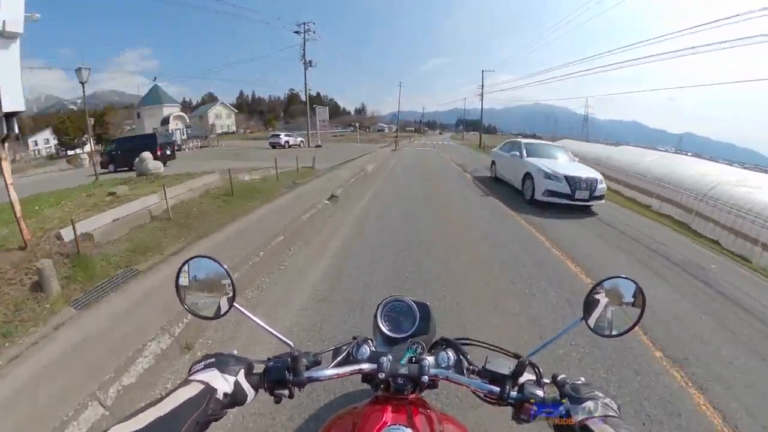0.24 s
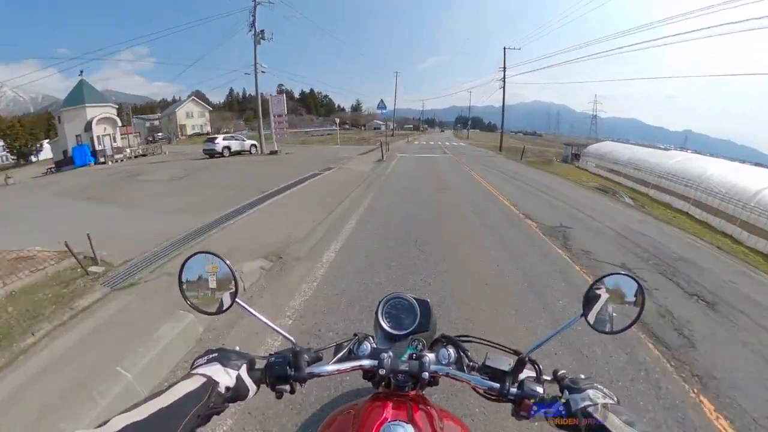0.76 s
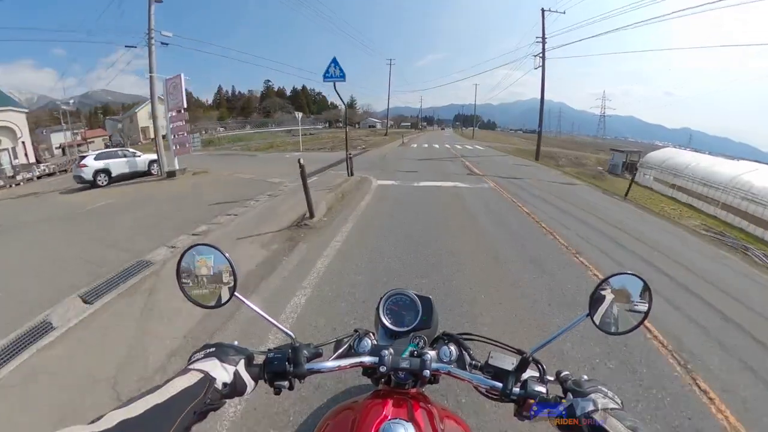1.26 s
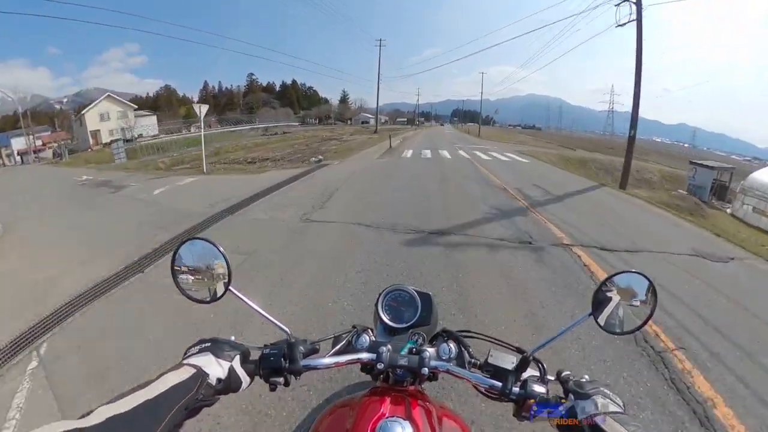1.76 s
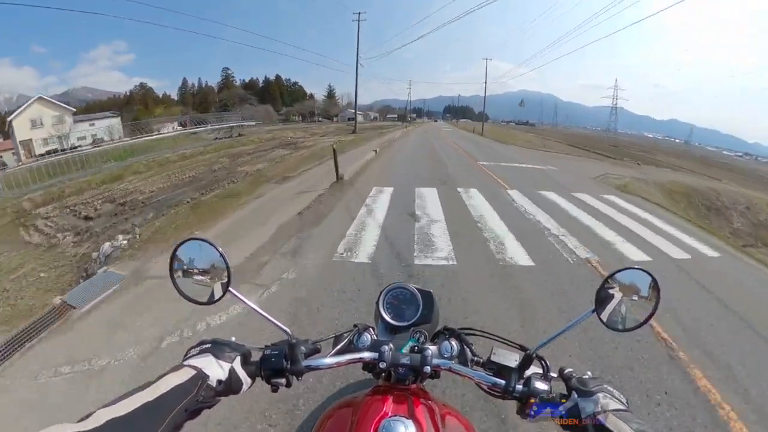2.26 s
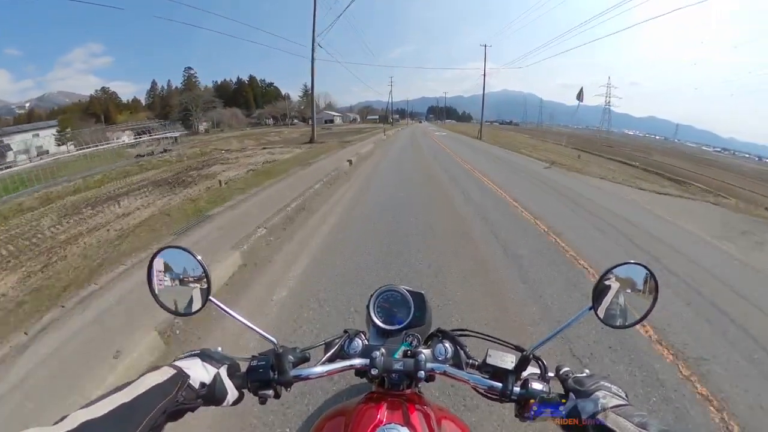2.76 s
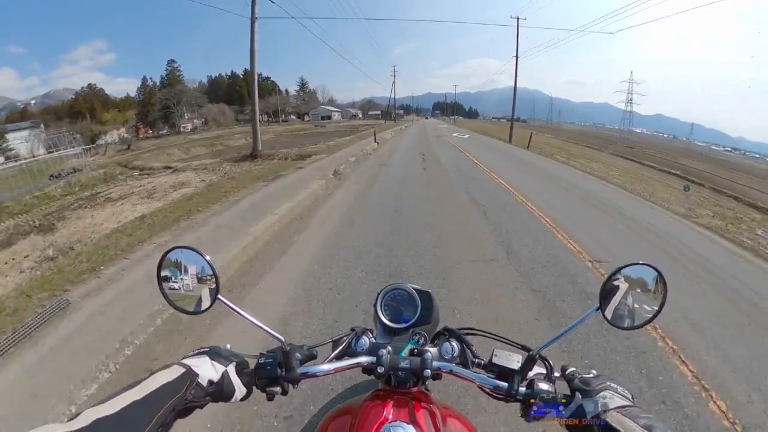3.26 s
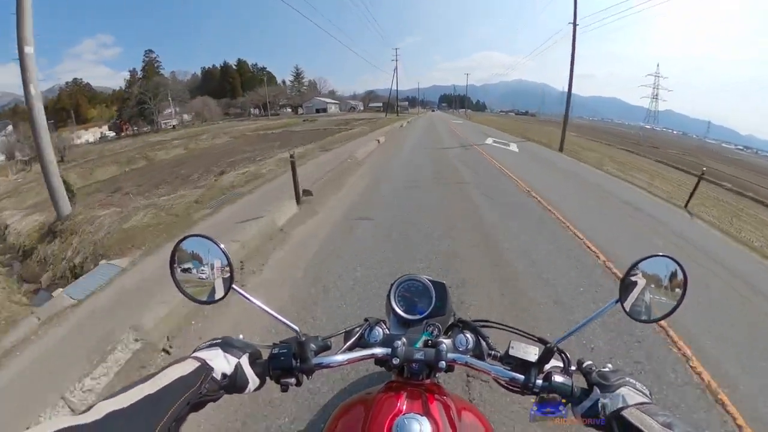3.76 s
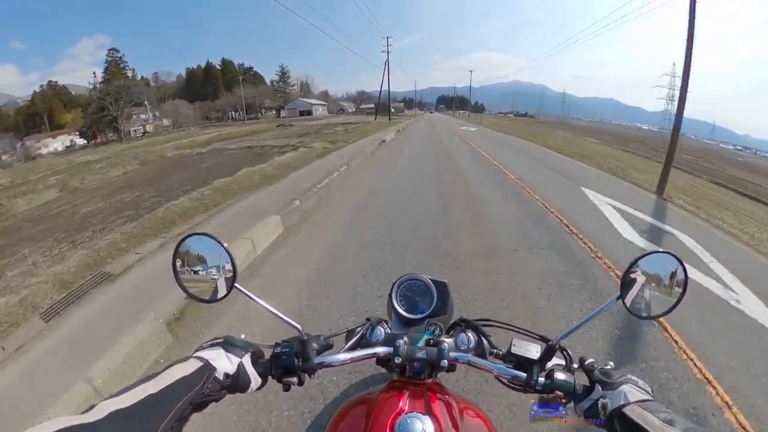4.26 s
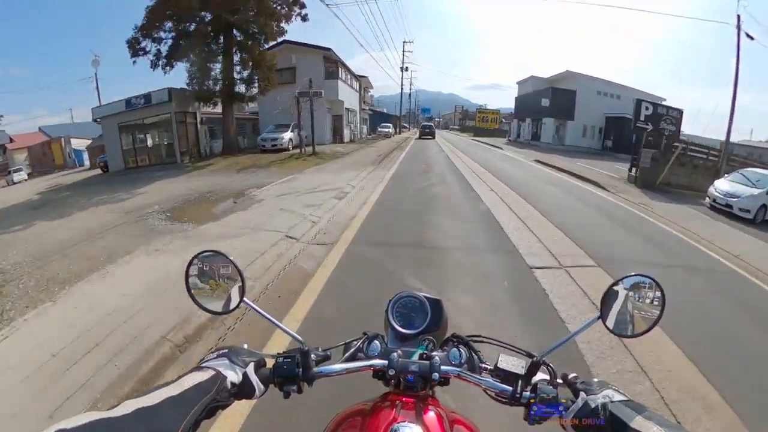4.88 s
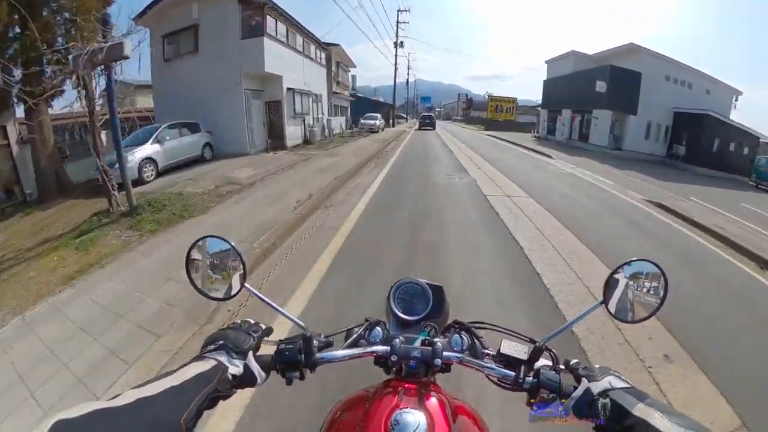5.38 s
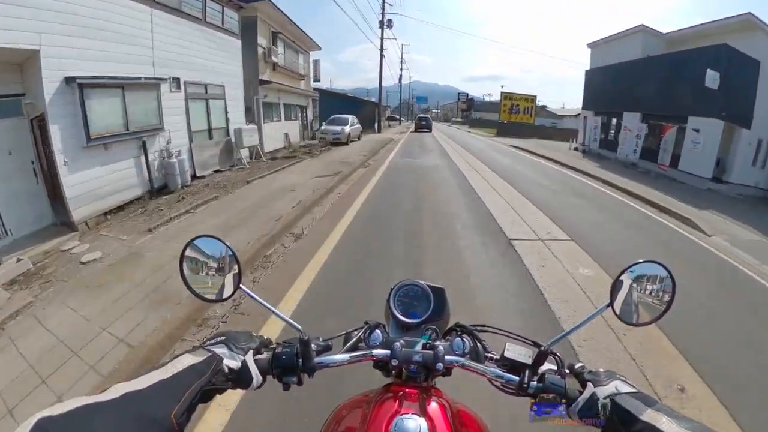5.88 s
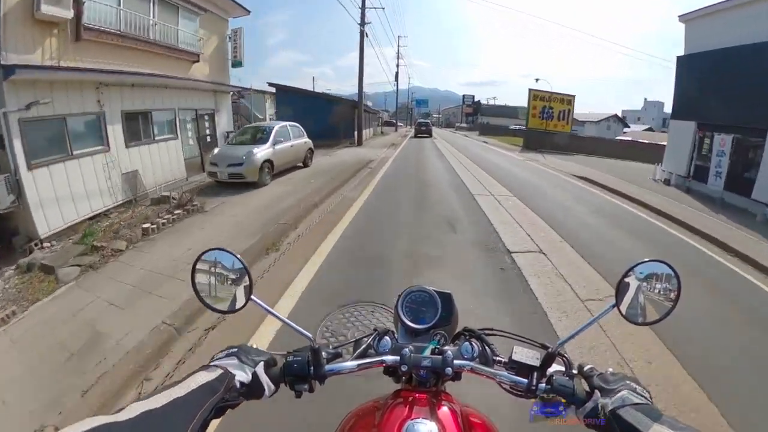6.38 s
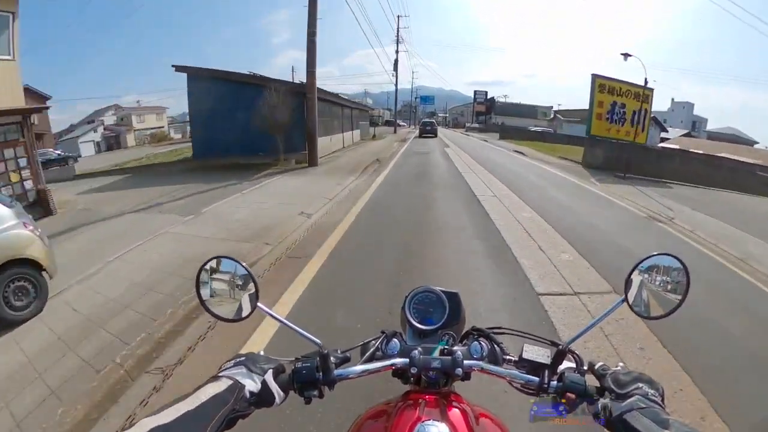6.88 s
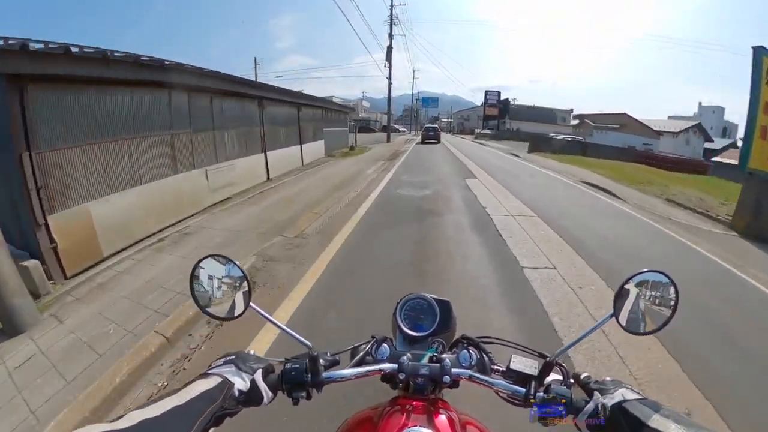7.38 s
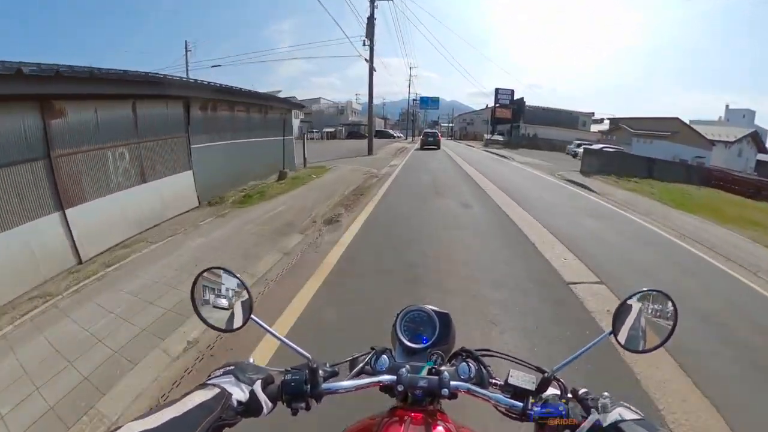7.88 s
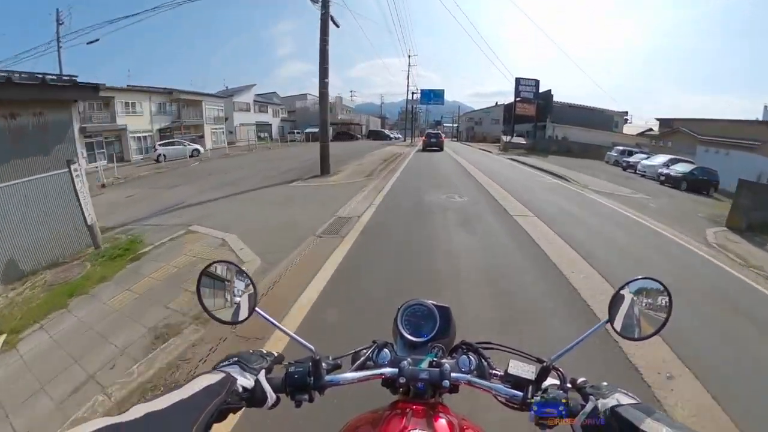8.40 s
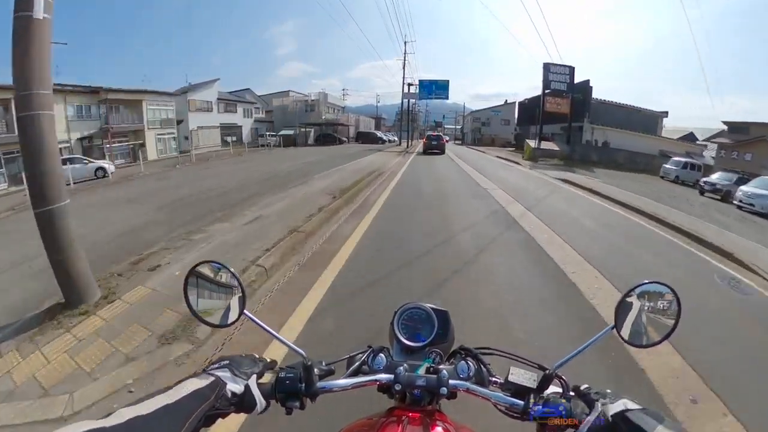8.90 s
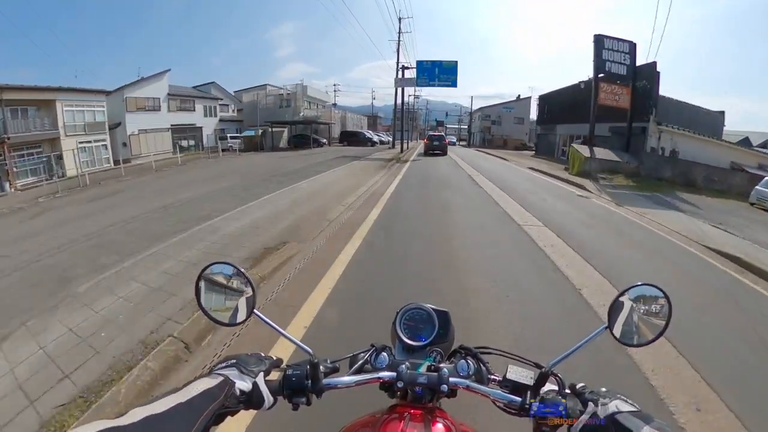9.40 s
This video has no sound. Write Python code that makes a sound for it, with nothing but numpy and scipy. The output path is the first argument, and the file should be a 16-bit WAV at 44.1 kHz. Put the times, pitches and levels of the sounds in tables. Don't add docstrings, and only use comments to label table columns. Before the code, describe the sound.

Close at the saddle of a single-cylinder motorcycle on an open road: a wind gust, then a steady low exhaust beat at cruise. A short surge comes, the throttle eases and the thumps soften, a hard knock sounds, then the engine pulls strongly, coasts quietly, and blips once more before the end. Fine valve clatter and tyre roar run beneath.

```python
import sys
import numpy as np
from scipy import signal
from scipy.io import wavfile

SR = 44100
rng = np.random.default_rng(int(sys.argv[2]) if len(sys.argv) > 2 else 0)


def level_to_linear(level):
    exponent = np.asarray(level, float) / 20
    return 10 ** exponent


def generate_wav(sig):
    pcm = np.round(np.clip(np.atleast_2d(sig).T, -1, 1) * 32767).astype(np.int16)
    wavfile.write(sys.argv[1], SR, pcm)


N = 425565

# frequency in Hz, level in dB per Hz.
BUFFET_SPECTRUM = [(15, 0), (25, 1.5), (45, 3.5), (65, -9.5), (90, -14.5), (140, -29), (250, -63)]
# centre in seconds, dB over the mean wind, half length in seconds.
GUSTS = [(0, 5.5, 0.26), (.75, 2, 0.055), (1.28, 9, 0.24), (1.68, -4, .04), (1.744, 9.5, 0.026),
         (2.066, 4, 0.049), (2.403, -10, .05), (2.51, 10.5, 0.077), (3.33, 5, .06), (3.506, 9, 0.011),
         (4.84, 4, 0.077), (5.114, 6, 0.074), (5.9, 2, .1), (6.643, 4, 0.085), (6.82, -1, .05),
         (7.36, -4, .04), (7.75, 1, 0.17), (8.395, -0.5, 0.069), (8.645, -3, 0.13), (8.95, -12, 0.07),
         (9.55, -1, 0.15)]
# frequency in Hz, level in dB per Hz.
RUMBLE_SPECTRUM = [(40, -36), (75, -7), (110, 0), (170, -1), (260, -4), (350, -11.5), (430, -27.5),
                   (700, -35)]
# frequency in Hz, level in dB per Hz.
ROAR_SPECTRUM = [(250, -37), (400, 4.5), (550, 5), (700, 0.5), (850, -4), (1050, -3), (1500, -8.5),
                 (2200, -17), (3000, -53), (4500, -59)]
# time in seconds, level in dB.
ROAD_SURFACE = [(0, 4), (.4, 1.5), (.8, 4), (1.3, 3.5), (1.6, 1), (4.4, 1), (4.65, 2), (4.9, -1.5),
                (6.3, -3), (7.2, -1), (8.7, -6.5), (9.0, -5), (9.65, -4)]
# throttle 0-1, rumble in dB, roar in dB.
ROAD_BY_THROTTLE = [(0, -27.5, -40), (.1, -25, -40), (.8, -26.5, -38.5), (1, -23.5, -38)]
# start in seconds, peak in dB, pitch in Hz, 60 dB decay in seconds.
KNOCKS = [(1.747, -22, 111.2, 0.046), (2.604, -24, 890, 0.011), (5.3068, -1.5, 327, 0.0099),
          (5.307, -26, 1500, 0.0055), (5.328, -13, 121, 0.053), (6.2287, -12.5, 680, 0.011),
          (6.2289, -15.5, 1430, 0.0099), (6.23, -38, 2000, .007), (8.369, -24, 229, 0.056),
          (8.602, -24.5, 209, 0.16), (9.165, -31, 610, 0.16), (9.195, -27, 587, 0.16),
          (9.25, -11.5, 203, 0.028)]
# frequency in Hz, level in dB per Hz.
CLATTER_SPECTRUM = [(1500, -52), (2400, 7.5), (3200, 9.5), (4200, -4), (5200, 5.5), (6500, 0.5), (8000, 3),
                    (10000, -2), (12000, -17), (13500, -30), (15000, -45)]
# throttle 0-1, clatter in dB, ring in dB.
VALVES_BY_THROTTLE = [(0, -56.5, -62.5), (.1, -58, -66.5), (.8, -51.5, -56), (1, -51, -55.5)]
# time in seconds, rattle in dB.
CHAIN_SLACK = [(0, 1.5), (.95, 1.5), (1.05, -3.5), (1.65, -1), (1.74, 3), (1.8, -3), (2.65, -0.5),
               (2.75, 1), (4.5, 2.5), (4.9, 2.5), (5.3, -0.5), (5.95, 2), (6.35, -1), (7.9, -0.5),
               (8.75, -3.5), (9.65, 1.5)]
# time in seconds, firings so far, speed gain until the next row in firings/s per s.
CRANK = [(0.015, 0, 0.36), (1.7211, 36, 0.24), (4.4371, 95, -27.91), (4.5308, 97, 0.0), (4.6566, 100, 8.75),
         (4.9692, 107, -1.46), (5.8002, 126, -19.57), (6.2337, 134, -26.48), (6.4837, 139, 0.51),
         (7.3462, 155, 0.05), (8.7911, 181, 35.11), (8.939, 184, 40.35), (9.0381, 186, 0.89),
         (9.6149, 198, 0)]
# start in seconds, new throttle 0-1, length of the twist in seconds.
GRIP_TWISTS = [(4.4, .86, .09), (4.49, 1, .03), (4.625, .1, .1), (5.93, .03, .05), (6.33, .72, .04),
               (6.4, .84, .08), (6.49, 1, .1), (7.355, .3, .04), (7.41, .04, .04), (7.47, 0, .08),
               (8.8, 1, .02), (8.9, .085, .08)]
# time in seconds, change in dB.
UNEVEN_BURNS = [(1.768, -3), (1.815, -2.5), (4.703, -9), (5.445, -2), (5.666, -2.5), (5.991, 1.5), (6.169, 2),
                (6.234, -9), (6.276, 3), (7.628, -2), (8.791, -1),
                (5.27, 1.5), (5.622, 1), (6.105, 4), (6.323, 3.5), (7.685, 0.5), (7.74, 5.5), (7.795, 5.5),
              (7.904, 5.5), (8.069, 3.5), (8.346, 3.5), (8.845, -0.5), (9.185, 1.5)]
# throttle 0-1, thump peak in dB, crack in dB.
EXHAUST_BY_THROTTLE = [(0, -21, -55.5), (.1, -11.5, -44.5), (.3, -10.5, -52), (.7, -10.5, -51),
                       (.8, -7.7, -34), (1, -5.5, -25)]
THROTTLES = [.1, .8, 1]
# frequency in Hz, fade in ms, lag in ms.
PIPE = [(77, 7.2, -.2), (117, 8.9, .8), (100, 6.8, 2.0)]
# lead in ms, rise in ms.
FRONT = [(3.2, 1.3), (3.0, .3), (.8, .5)]
# depth relative to the front, lead in ms, width in ms.
SUCTION = [(.5, 5.0, 1.8), (.29, 1.74, .55), (.56, 1.84, .85)]
# share of the pipe ring, frequency in Hz, fade in ms.
BAFFLE = [(.02, 326, 8.0), (.17, 344, 5.6), (.65, 283, 2.6)]
# frequency in Hz, width in Hz, level in dB.
CHAMBERS = [(1783, 480, 8), (2008, 88, -11), (1226, 260, -2), (1500, 190, -3.5), (3015, 210, -11),
            (3610, 240, -10), (4730, 600, -11), (5940, 620, -18), (10500, 2800, -28)]
# frequency in Hz, width in Hz, level in dB.
SHELL = [(500, 180, -7), (750, 130, -4), (860, 120, -5)]

CRUISE_THROTTLE = .8
COASTING_UNEVEN_DB = -1.55
WIND_DB, WIND_WANDER_DB = -27, 1.2
RUMBLE_FOLLOWS_ROAD, RUMBLE_WANDER_DB = 0.82, .8


def read_table(rows, at=None):
    first, *columns = np.transpose(rows)
    where = np.arange(N) / SR if at is None else at
    return [np.interp(where, first, column) for column in columns]


def rms_one(x):
    return x / np.sqrt(np.mean(x ** 2) + 1e-20)


def drift(rate):
    step, settle = 40, 2000
    r = np.exp(-2 * np.pi * step * rate / SR)
    sparse = rng.standard_normal(N // step + settle + 2)
    slow = signal.lfilter([1], [1, -2 * r, r * r], sparse)[settle:]
    return np.interp(np.arange(N) / step, np.arange(len(slow)), rms_one(slow))


def resonate(x, hz, width):
    r = np.exp(-np.pi * width / SR)
    top = [(1 - r * r) / 2, 0, (r * r - 1) / 2]
    bottom = [1, -2 * r * np.cos(2 * np.pi * hz / SR), r * r]
    return signal.lfilter(top, bottom, signal.lfilter(top, bottom, x))


def pair(shape, alike):
    mid, side = rng.standard_normal((2,) + shape)
    mid = np.sqrt(1 + alike) * mid
    side = np.sqrt(1 - alike) * side
    return np.array([mid + side, mid - side]) / np.sqrt(2)


def banded(spectrum, alike, patchy_db, rate):
    hz, level_db = np.transpose(spectrum)
    edges = hz[0] * 2 ** np.arange(0, np.log2(hz[-1] / hz[0]), .5)
    white = [pair((N,), alike), pair((N,), alike)]
    together = drift(rate)
    out = 0
    for k, (low, high) in enumerate(zip(edges, edges[1:])):
        band_pass = signal.butter(2, [low, high], "band", fs=SR, output="sos")
        band = signal.sosfilt(band_pass, white[k % 2])
        centre_db = np.interp(np.log(low * high) / 2, np.log(hz), level_db)
        flicker_db = patchy_db * (0.51 * together + drift(rate))
        out = out + level_to_linear(centre_db + flicker_db) * band
    return rms_one(out)


def balance(x, db):
    return x * level_to_linear(np.array([[db / 2], [-db / 2]]))


def gust_level():
    t = np.arange(0, N / SR + .01, .005)
    bells = sum(db * np.exp(-((t - s) / half) ** 2) for s, db, half in GUSTS)
    return WIND_DB + WIND_WANDER_DB * drift(2.0) + np.interp(np.arange(N) / SR, t, bells)


def wind():
    buffet = banded(BUFFET_SPECTRUM, alike=-0.42, patchy_db=0.5, rate=4.8)
    return level_to_linear(gust_level() + 5.0) * balance(buffet, db=1.3)


def road(phase, throttle):
    road_db, = read_table(ROAD_SURFACE)
    rumble_db, roar_db = read_table(ROAD_BY_THROTTLE, throttle)
    rumble_db = rumble_db + RUMBLE_FOLLOWS_ROAD * road_db + RUMBLE_WANDER_DB * drift(2.5)
    roar_db = roar_db + road_db + 0.9 * drift(3.8)
    swell = np.exp(-(phase % 1) / 0.19)
    rumble = balance(banded(RUMBLE_SPECTRUM, alike=0.77, patchy_db=1.5, rate=5.1), db=-0.5)
    rumble = rumble * level_to_linear(rumble_db - 2.0 + 2.6 * swell)
    roar = balance(banded(ROAR_SPECTRUM, alike=0.6, patchy_db=2.0, rate=87.0), db=1.0)
    roar = roar * level_to_linear(roar_db + 0.1 + 1.0 * swell)
    hum = rms_one(resonate(pair((N,), alike=0.65), hz=819, width=116))
    hum = hum * level_to_linear(roar_db - 7.5 + 4.0 * swell)
    return rumble + roar + hum


def knocks():
    out, t = np.zeros(N + SR // 4), np.arange(SR // 4) / SR
    for s, peak_db, hz, t60 in KNOCKS:
        i = round(s * SR)
        soft = 1 - np.exp(-(4 * hz * t) ** 2)
        out[i:i + len(t)] -= soft * level_to_linear(peak_db - 60 * t / t60) * np.sin(2 * np.pi * hz * t)
    return balance(out[:N], db=5.0)


def valve_gear(phase, throttle):
    slack_db, = read_table(CHAIN_SLACK)
    clatter_db, ring_db = read_table(VALVES_BY_THROTTLE, throttle) + slack_db
    beat = np.cos(2 * np.pi * (phase - .33))
    clatter = banded(CLATTER_SPECTRUM, alike=0.031, patchy_db=1.7, rate=31.0)
    clatter = clatter * level_to_linear(clatter_db + 1.16 * beat)
    ring = rms_one(resonate(pair((N,), alike=0.14), hz=8695, width=970))
    ring = ring * level_to_linear(ring_db - 2.2 + 2.8 * beat + 3.5 * drift(31.0))
    return balance(clatter + ring, db=2.5)


def cycle_phase():
    s, count, gain = np.transpose(CRANK)
    t = np.arange(N) / SR
    k = np.clip(np.searchsorted(s, t) - 1, 0, len(s) - 2)
    mean_speed = (count[k + 1] - count[k]) / (s[k + 1] - s[k])
    return count[k] + (t - s[k]) * (mean_speed + gain[k] * (t - s[k + 1]) / 2)


def grip():
    rows, held = [], CRUISE_THROTTLE
    for s, new, length in GRIP_TWISTS:
        rows += [(s, held), (s + length, new)]
        held = new
    return read_table(rows)[0]


def odd_burns(at):
    out = np.zeros((len(at), 1))
    for s, db in UNEVEN_BURNS:
        out[np.argmin(abs(at / SR - s))] += db
    return out


def pulse(ms, pipe, front, suction, baffle):
    pipe_hz, pipe_fade, pipe_lag = pipe
    front_lead, front_rise = front
    depth, suction_lead, suction_width = suction
    share, baffle_hz, baffle_fade = baffle
    after = np.maximum(ms, 0)
    rise = 1 / (1 + np.exp(np.clip(-(ms + front_lead) / front_rise, -50, 50)))
    ring = np.exp(-after / pipe_fade) * np.cos(2 * np.pi * pipe_hz * (ms - pipe_lag) / 1000)
    ring = ring + share * np.exp(-after / baffle_fade) * np.cos(2 * np.pi * baffle_hz * ms / 1000)
    dip = depth * np.exp(-.5 * ((ms + suction_lead) / suction_width) ** 2)
    wave = rise * ring - dip
    return wave / wave.max(axis=1, keepdims=True)


def evened(rows, lead):
    crest = rows.mean(axis=0)[:, lead - 60:lead + 260]
    return rows / np.sqrt(np.mean(crest ** 2, axis=1, keepdims=True))


def struck(noise, modes, lead, spread_db):
    out = 0
    for hz, width, db in modes:
        rows = evened(resonate(noise, hz, width), lead)
        out = out + rows * level_to_linear(db + spread_db * rng.standard_normal((rows.shape[1], 1)))
    return out


def exhaust_thump(ms, throttle, thump_db, luck, uneven):
    stretched = ms * (1 + .025 * luck[:, 0])
    shapes = [pulse(stretched, *state) for state in zip(PIPE, FRONT, SUCTION, BAFFLE)]
    thump = sum(np.interp(throttle, THROTTLES, share) * shape for share, shape in zip(np.eye(3), shapes))
    thump = thump * level_to_linear(thump_db + 1.6 - .7 * throttle + .7 * uneven * luck[:, 1])
    return signal.lfilter(*signal.butter(2, 1100, fs=SR), thump)


def gas_crack(ms, lead, crack_db, luck, uneven):
    burst = np.exp(-np.where(ms < -.6, ((ms + .6) / .9) ** 2, (ms + .6) / 1.2))
    burst = burst + .17 * (ms > 0) * np.exp(-ms / 6)
    gas = pair((len(luck), len(ms)), alike=0.9) * burst
    crack = evened(struck(gas, CHAMBERS, lead, spread_db=1.4), lead)
    return crack * level_to_linear(crack_db - 2.5 + 1.4 * uneven * luck[:, 2])


def shell_rattle(ms, lead, throttle, thump_db, luck):
    push = np.exp(-np.where(ms < -1, ((ms + 1) / 2.8) ** 2, (ms + 1) / 1.07))
    shaking = pair((len(luck), len(ms)), alike=0.94) * push
    shell = evened(struck(shaking, SHELL, lead, spread_db=1.8), lead)
    return shell * level_to_linear(thump_db - 27 + 3.0 * throttle + 3.0 * throttle ** 8 + luck[:, 3])


def exhaust(phase, throttle):
    at = np.flatnonzero(np.diff(np.floor(phase)) > 0)
    throttle = throttle[at, None]
    thump_db, crack_db = (db + odd_burns(at) for db in read_table(EXHAUST_BY_THROTTLE, throttle))
    luck = rng.standard_normal((len(at), 4))[:, :, None]
    uneven = np.clip((1 - throttle) / .2, .2, 1)
    thump_db = thump_db + COASTING_UNEVEN_DB * (throttle < .2) * luck[:, 1]
    lead, size = 500, 2100
    ms = (np.arange(size) - lead) / SR * 1000
    thump = exhaust_thump(ms, throttle, thump_db, luck, uneven)
    crack = gas_crack(ms, lead, crack_db, luck, uneven)
    shell = shell_rattle(ms, lead, throttle, thump_db, luck)
    left_right = level_to_linear(np.array([1.7, -2.1]))[:, None, None]
    rows = left_right * thump + crack + shell
    out = np.zeros((2, N + size))
    for k, i in enumerate(at):
        out[:, i:i + size] += rows[:, k]
    return out[:, lead:lead + N]


def scene():
    phase, throttle = cycle_phase(), grip()
    background = wind() + road(phase, throttle) + knocks()
    return background + valve_gear(phase, throttle) + exhaust(phase, throttle)


def band_limit(x):
    return signal.sosfilt(signal.butter(12, 15200, fs=SR, output="sos"), x)


def record(dry):
    mic = signal.lfilter(*signal.butter(2, 22, "high", fs=SR), dry)
    rounded = np.clip(1.6 * np.tanh(mic / 1.6), -.99, .99)
    return band_limit(rounded)


dry = scene()
out = record(dry)
generate_wav(out)
```